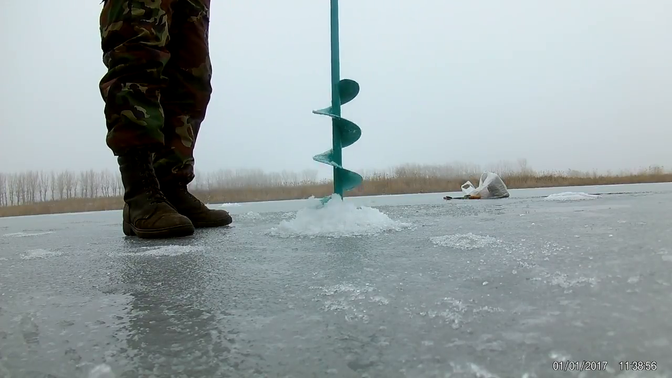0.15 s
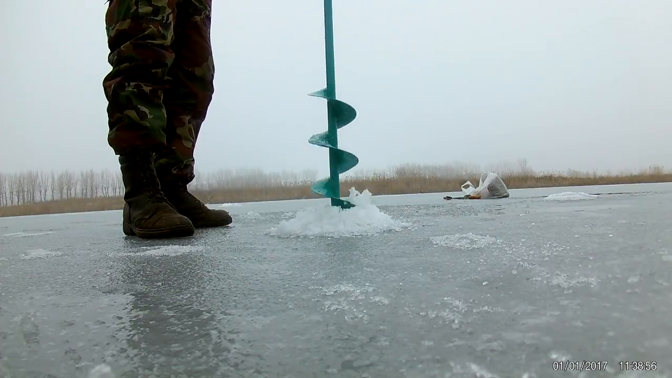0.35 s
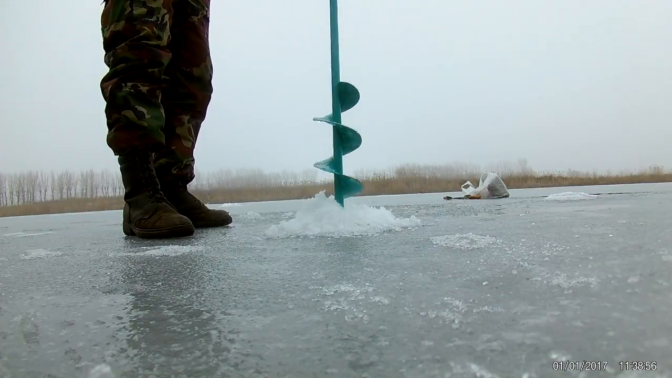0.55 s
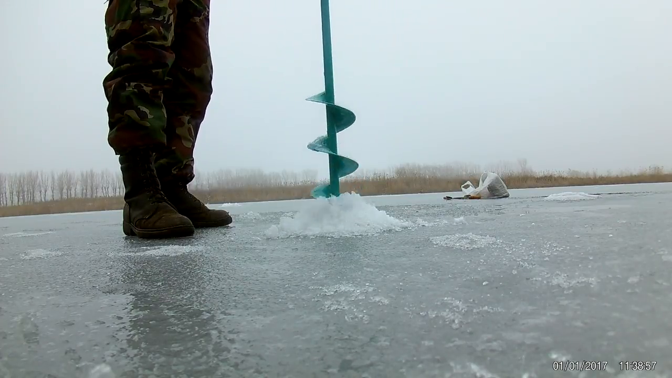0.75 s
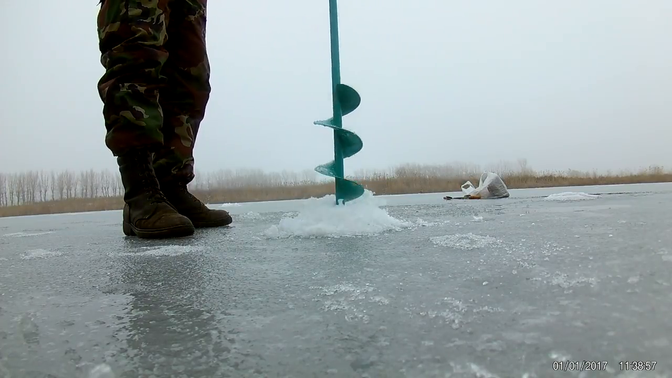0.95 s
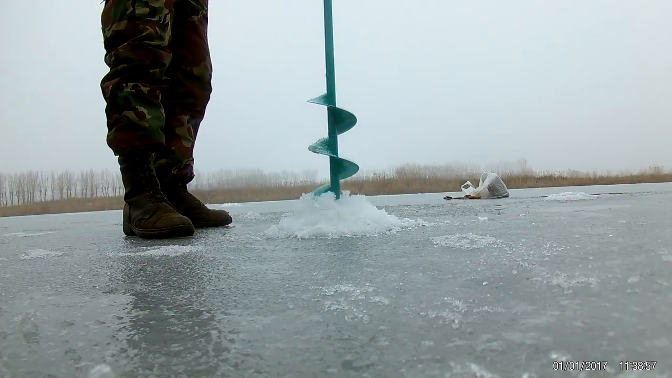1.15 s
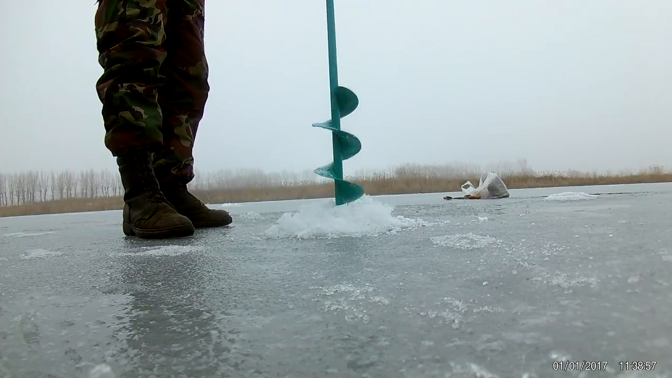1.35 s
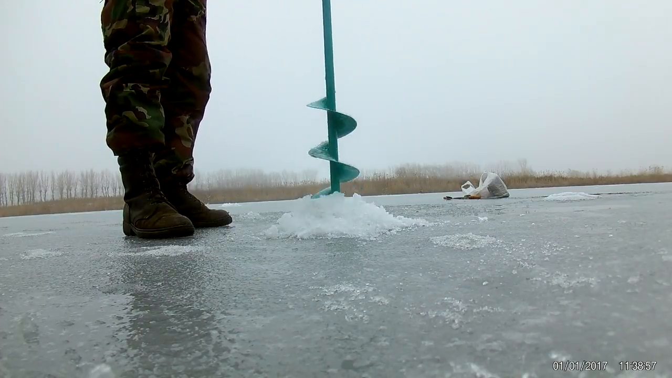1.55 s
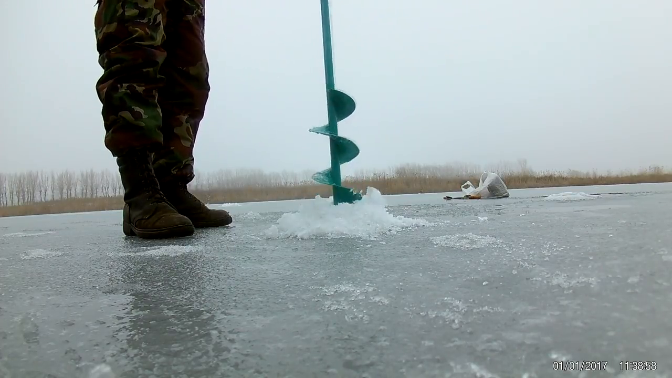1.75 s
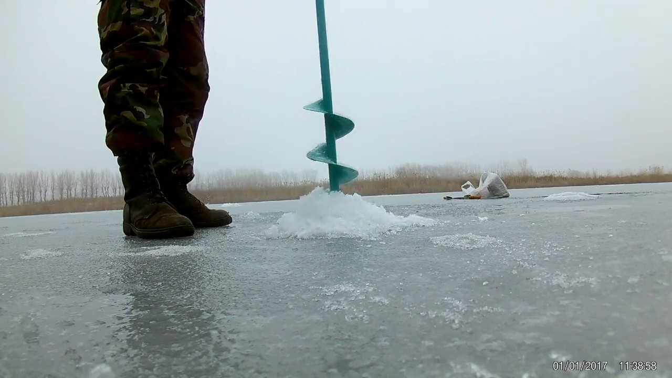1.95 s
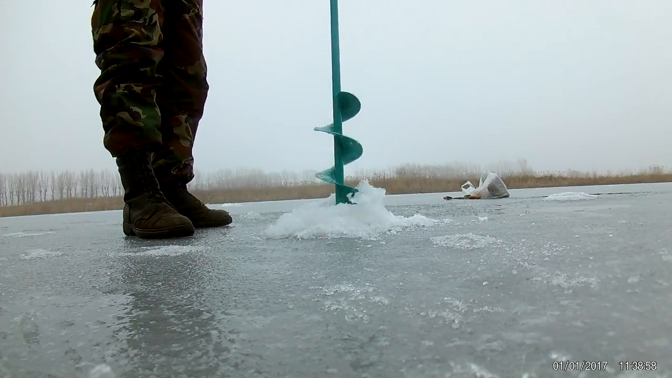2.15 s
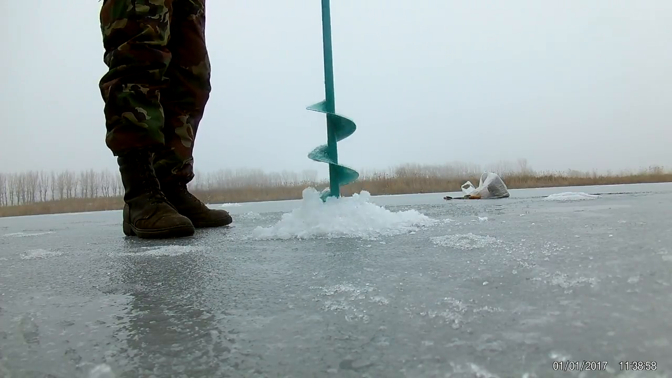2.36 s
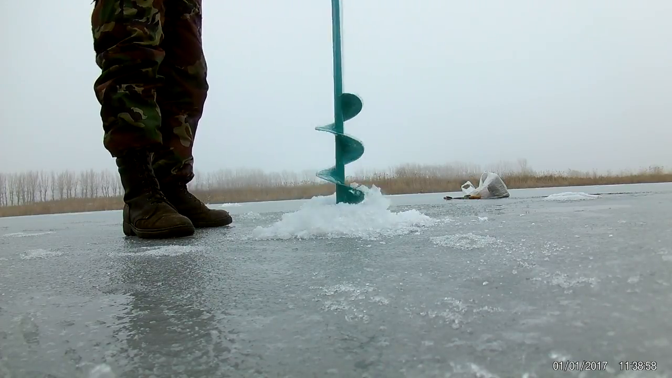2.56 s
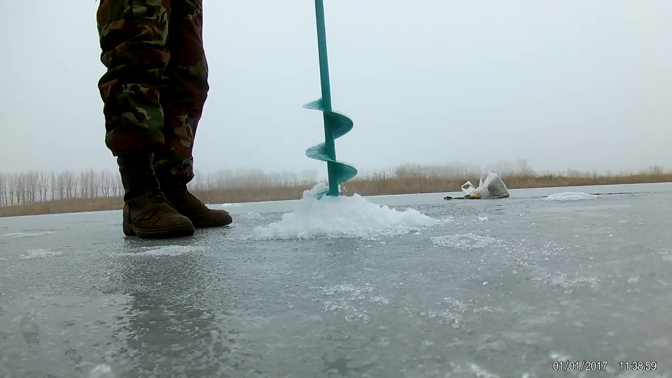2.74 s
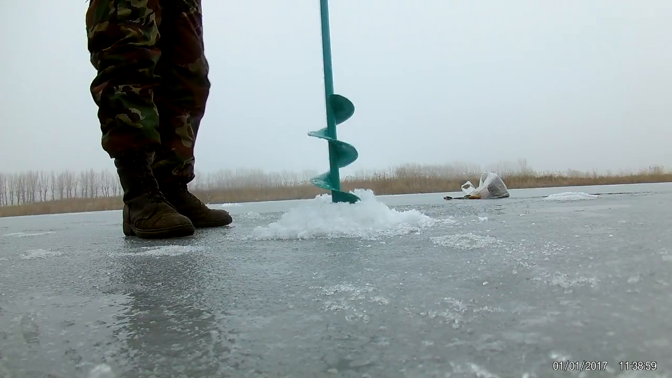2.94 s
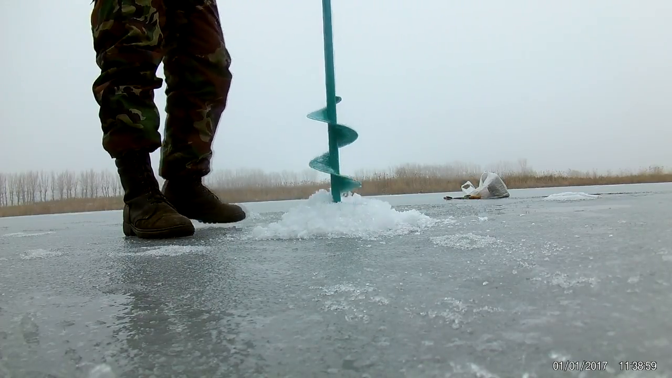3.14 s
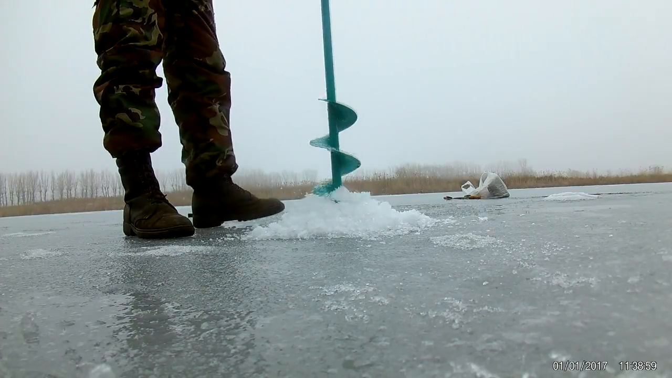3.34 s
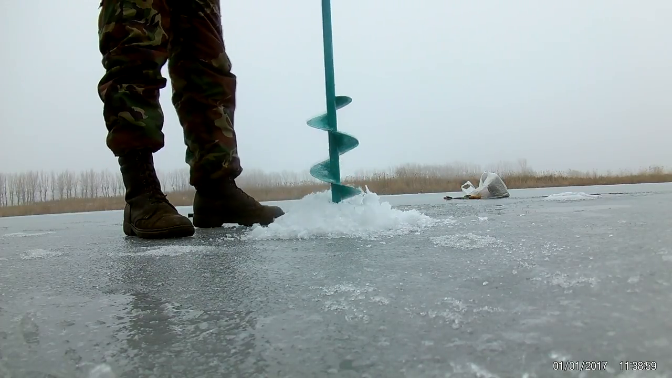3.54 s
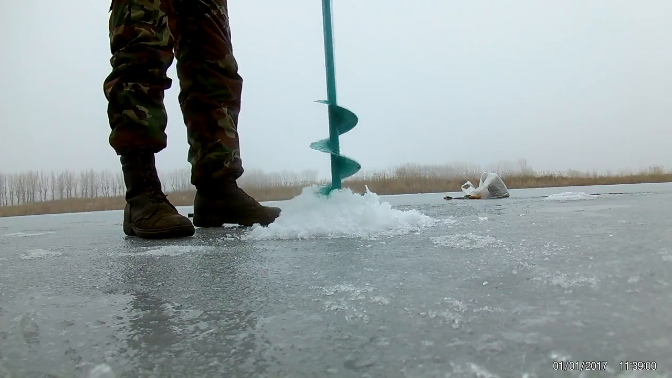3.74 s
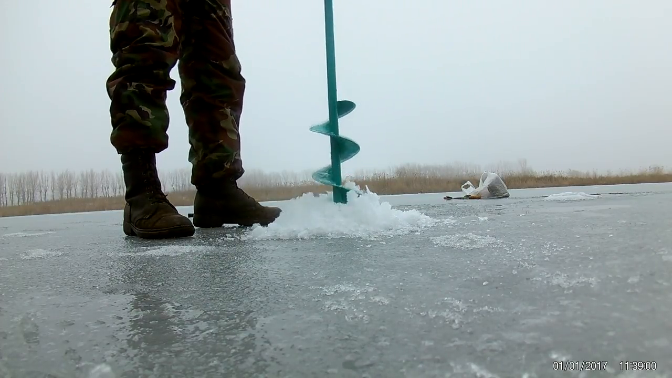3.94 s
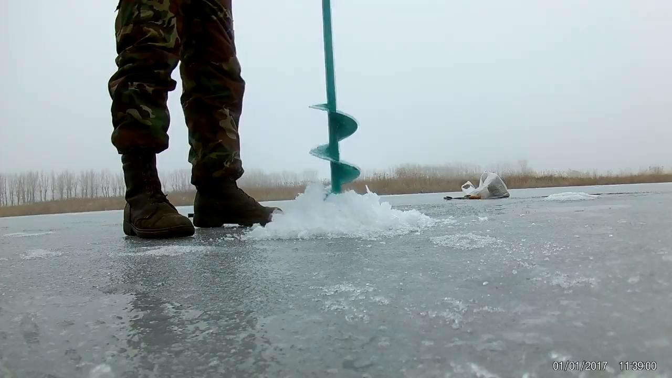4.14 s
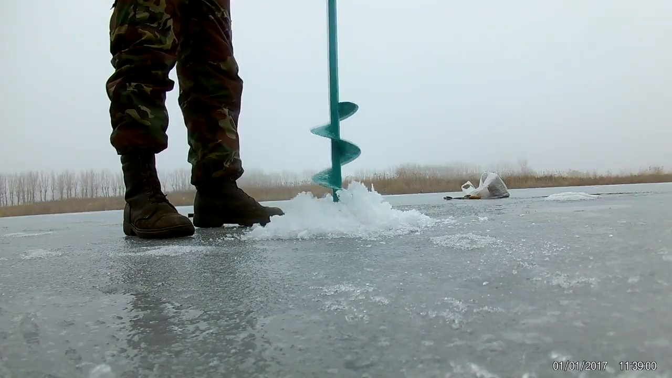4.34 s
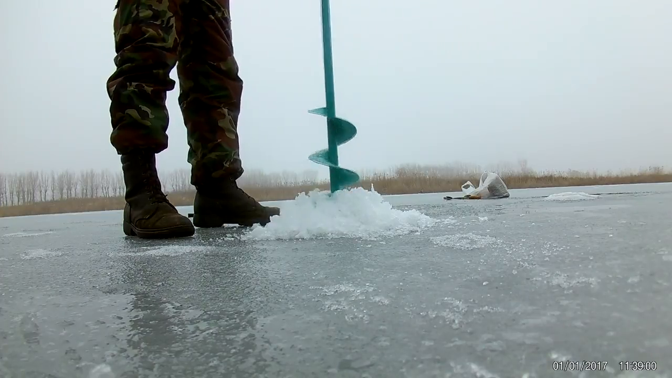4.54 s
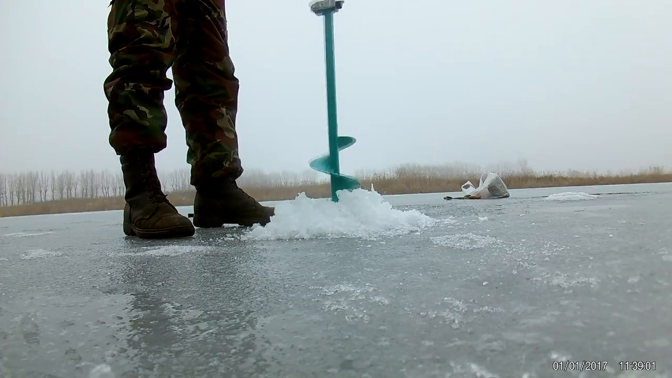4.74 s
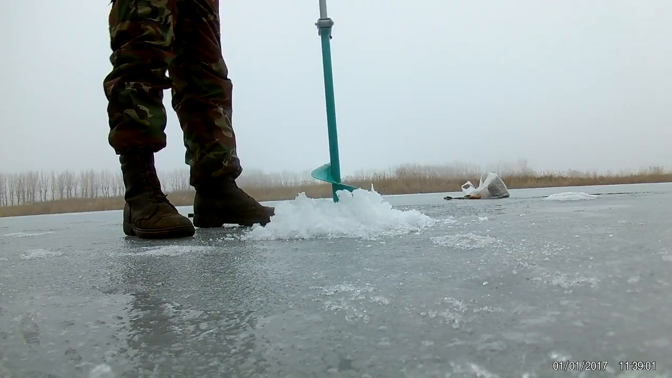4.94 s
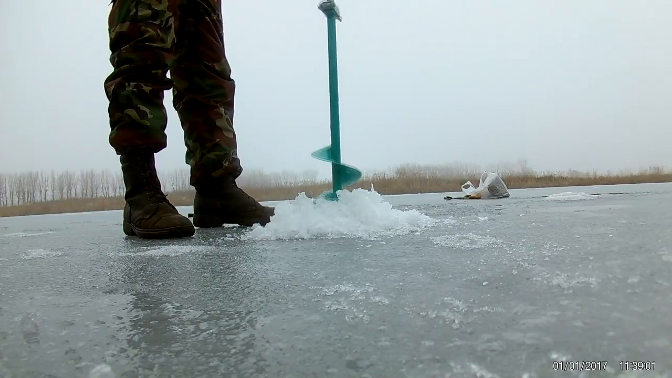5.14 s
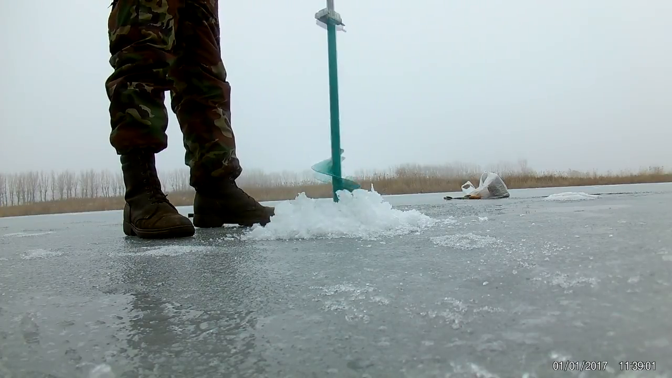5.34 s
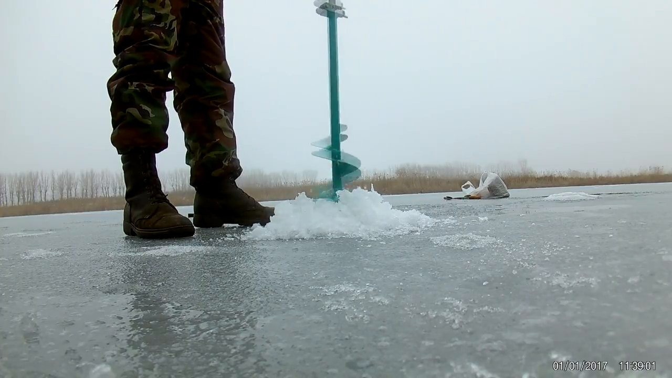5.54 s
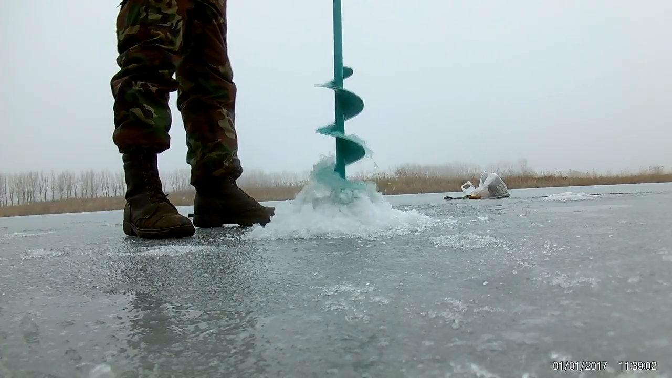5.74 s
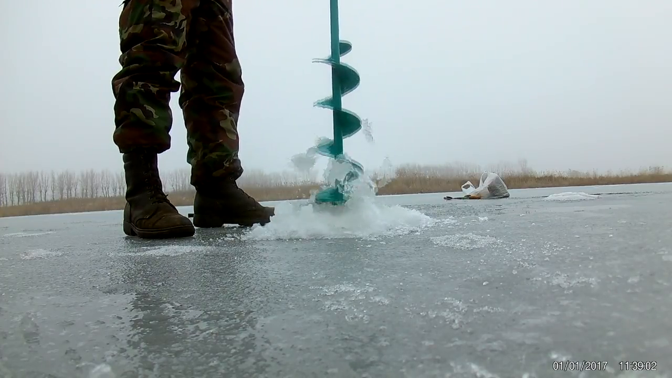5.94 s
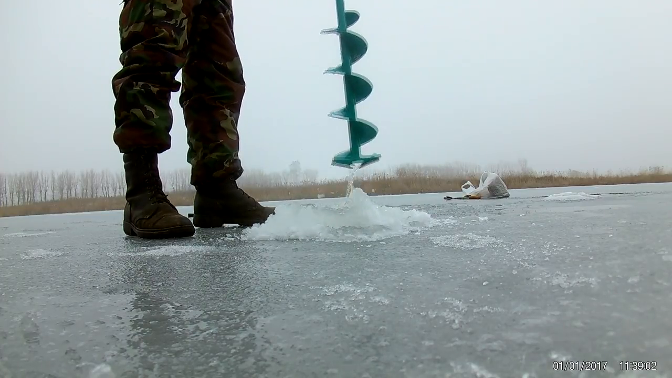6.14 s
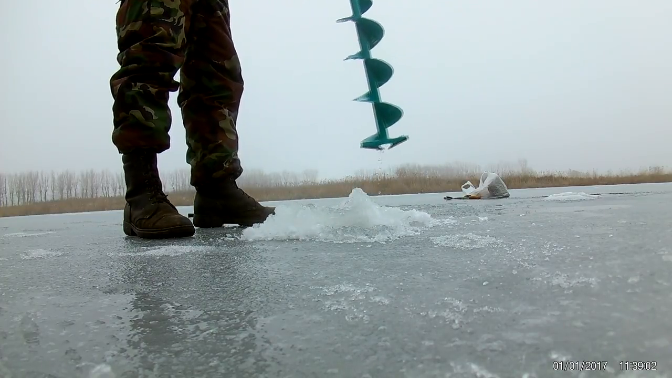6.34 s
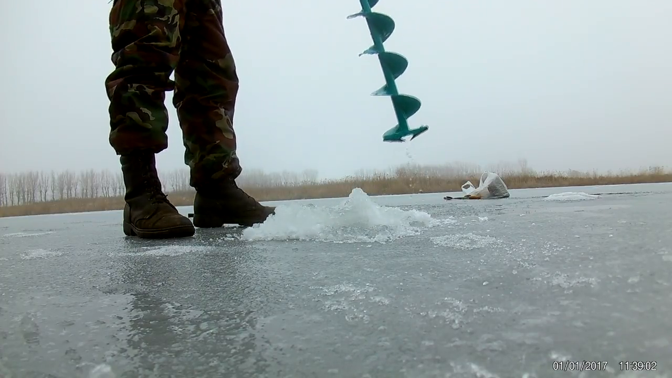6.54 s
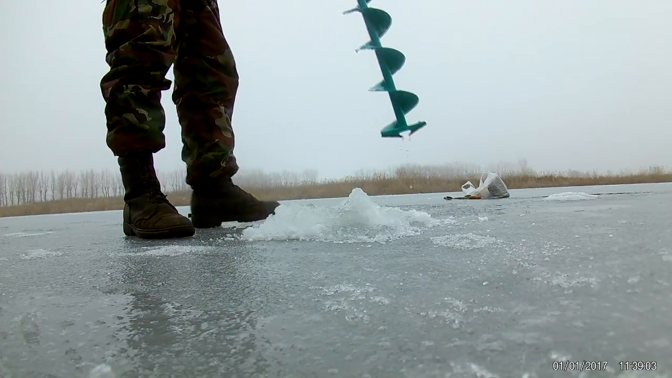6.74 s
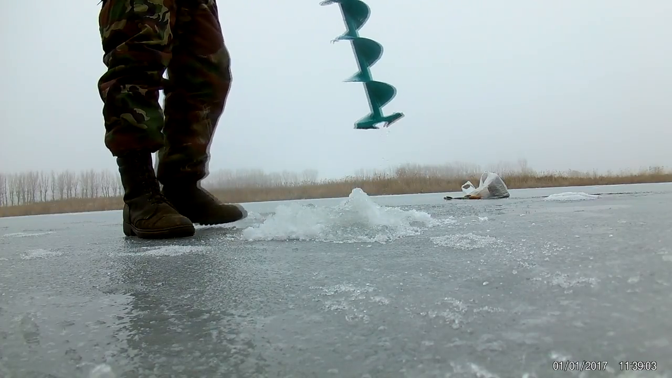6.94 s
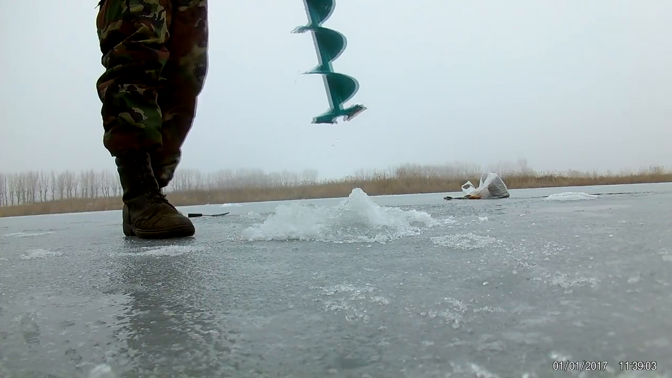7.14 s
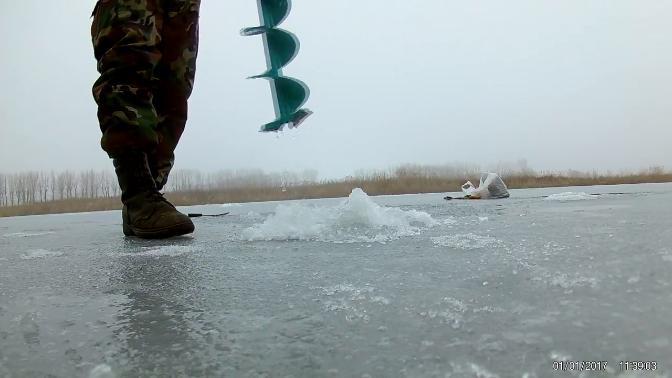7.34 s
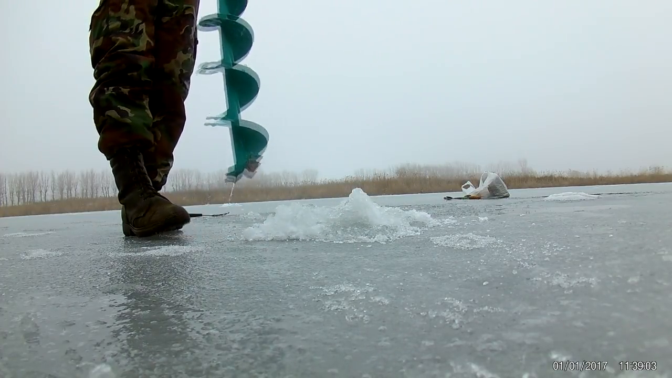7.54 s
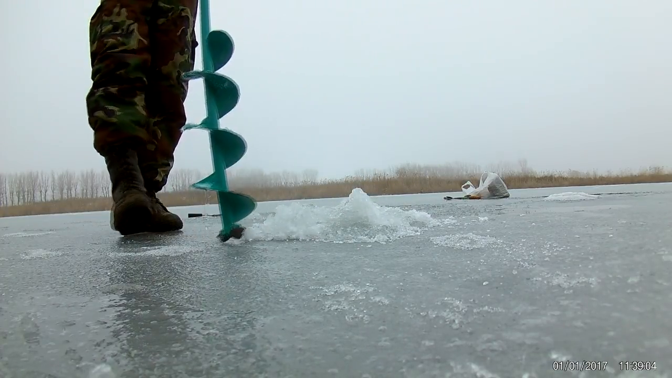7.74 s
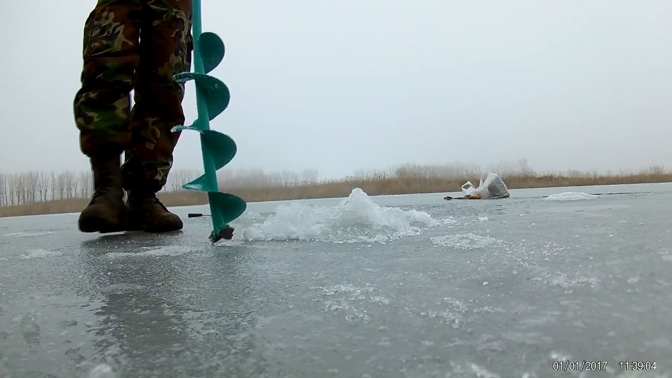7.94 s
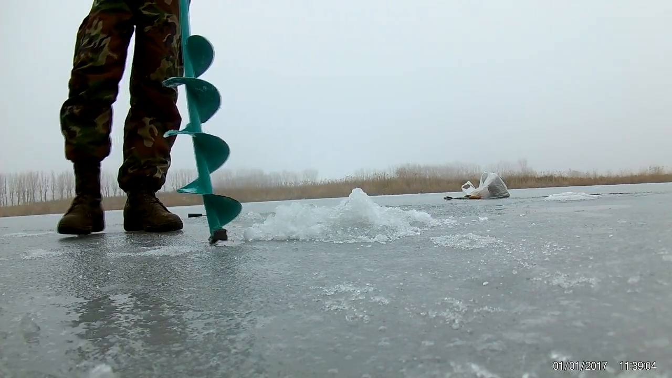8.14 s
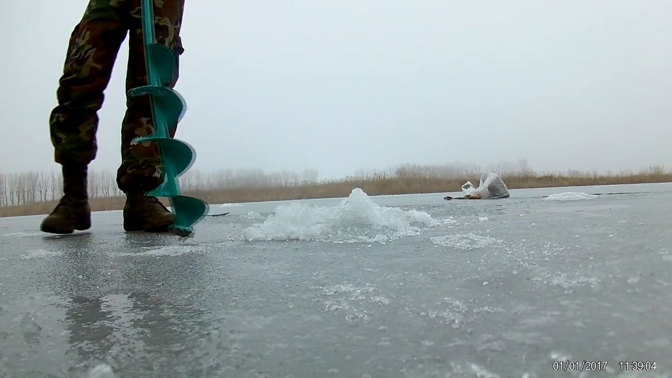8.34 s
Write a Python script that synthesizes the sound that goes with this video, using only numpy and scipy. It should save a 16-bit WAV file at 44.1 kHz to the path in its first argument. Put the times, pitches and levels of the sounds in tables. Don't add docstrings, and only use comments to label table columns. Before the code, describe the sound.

Close, boxy crunching of blades cutting ice, slipping and catching irregularly, lasts over half the scene. Then come clustered knocks, brief tonal groans and loud jerks as the jammed auger is pulled through. Afterwards there are sparse watery drips, a thin fading metal ring, slight grit underfoot and two low thumps on the ice. Still outdoor air; the microphone sits enclosed on the ice, with dull treble.

```python
import sys
import numpy as np
from scipy import signal
from scipy.fft import rfft, irfft
from scipy.io import wavfile

SR = 44100
rng = np.random.default_rng(int(sys.argv[2]) if len(sys.argv) > 2 else 0)


def gain_from_db(level_db):
    decades = np.asarray(level_db, float) / 20
    return 10 ** decades


def generate_wav(signal):
    frames = np.transpose(np.atleast_2d(signal))
    scaled = np.clip(frames, -1, 1) * 32767
    pcm = np.round(scaled).astype(np.int16)
    wavfile.write(sys.argv[1], SR, pcm)


N = 369999
TIME = np.arange(N) / SR
RUN_IN = 2000

# (time [s], bite [dB], weight leaning on the ice [dB])
EFFORT = [(0.0, -37, 1.5), (0.3, -36, 1.5), (0.75, -37, 1), (1.3, -37, -0.5), (1.75, -36, 0.5),
          (2.15, -37.5, 1), (2.45, -40, 1), (2.7, -42, 1), (2.87, -37, 0), (3.0, -38.5, 6.5), (3.3, -37, 3),
          (3.55, -38, -1.5), (3.9, -38.5, -2), (4.3, -37, -1), (4.52, -40, -0.5), (4.612, -32.5, 3.5),
          (4.772, -61.5, 27.5), (4.85, -90, 0)]
# (time [s], change of bite [dB], build-up [s])
SLIPS = [(0.005, -6, 0.063), (0.19, -2, 0.15), (0.33, -3, 0.054), (0.672, -2.5, 0.14), (0.849, -6, 0.058),
         (0.93, -5.5, 0.017), (0.975, -2, 0.032), (1.039, -1.5, 0.065), (1.11, 2, .04), (1.141, -5, 0.059),
         (1.238, -5, 0.096), (1.4, -1, .05), (1.949, -7, 0.032), (2.071, -14.5, 0.056), (2.18, -3, 0.03),
         (2.361, -5.5, 0.027), (2.49, -2.5, 0.16), (2.559, 9, 0.074), (2.6, -3.5, 0.15),
         (2.78, -6.5, 0.096), (3.33, 4, 0.16), (3.586, -13.5, 0.047), (3.65, 3.5, 0.016), (3.7, -8, 0.041),
         (3.8, 3.5, 0.062), (3.87, 1, 0.067), (3.99, 3.5, 0.12), (4.15, -1.5, 0.16), (4.44, -3, 0.063)]
# level while cutting [dB], response to bite [dB/dB], response to weight [dB/dB]
CUT_DB = [-44, -52, -40, -56.5]
CUT_FOLLOWS = [1, 1.3, 1.05, 0.99]
CUT_LEANS = [0.56, 0.66, .01, 0.055]
# (time [s], hold [s], bite [dB], release [dB/s], weight [dB])
JERKS = [
    (4.798, 0.0038, -43, 163, 2.5),
    (4.926, 0.029, -40.5, 844, 4.5),
    (5.138, 0.029, -39, 316.5, 2.5),
    (5.352, 0.022, -43.5, 147, 8.5),
    (5.39, 0.033, -34, 597, 3.5),
    (5.511, 0.097, -44, 246, 13),
    (5.74, .005, -53.5, 194, -4),
]
# level [dB], response to rise and release [dB/dB], response to weight [dB/dB]
JERK_DB = [1, -13, -3.5, -23.5]
JERK_FOLLOWS = [0.7, 0.78, 0.89, .9]
JERK_LEANS = [0.51, 1.16, 0.0091, .3]
# level [dB], fading [dB/s]
SLUSH_DB = [-101, -72, -61.5, -73]
SLUSH_FADES_DB_PER_S = [9, 66, 24, 18]
TRICKLE_DB = [-83, -84, -81.5, -90.5]
# (time [s], wall [dB], edge [dB], ice [dB])
CRACKS = [(0.265, -5.5, -42, -40), (0.3755, -24, -40, -46), (0.4631, -5, -36, -35), (0.7488, -9, -52, -49),
          (0.8785, -12, -15, -43), (1.081, -7, -33, -44), (1.2863, -28, -43, -34), (1.3536, -11, -43, -23),
          (1.4695, -10, -37, -26), (1.6821, -20, -45, -37), (1.827, -20, -31, -26), (1.9983, -16, -44, -32),
          (2.5466, -22, -15, -48), (3.1186, -5.5, -48, -28), (3.2834, -26, -38, -44),
          (3.4364, -34, -25, -41), (3.5945, -34, -38, -56), (3.79, -24, -38, -17),
          (4.3171, -39.5, -32, -26), (4.3755, -19, -44, -49)]
# (time [s], wall [dB], edge [dB], ice [dB])
JAM_KNOCKS = [(4.5738, -31, -34, -22), (4.580, -34, -16.5, -43), (4.606, -20.5, -14.5, -35),
              (4.6114, -33, -19, -16), (4.625, -27, -17.5, -49), (4.6412, -32, -24, -54),
              (4.652, -25, -33, -32), (4.6594, -32, -29, -35), (4.669, -28, -17.5, -44),
              (4.6889, -32, -57, -41), (4.7204, -47, -37.5, -45), (4.7386, -41, -54, -52),
              (4.7783, -39, -49, -51), (4.8015, -30, -39, -23), (4.8244, -35.5, -59, -33),
              (4.927, -34, -25, -37), (4.9554, -30, -23.5, -28), (4.975, -57, -39.5, -48),
              (5.0335, -59, -51, -34.5), (5.1016, -49, -50, -55), (5.107, -43, -46, -32)]
# (time [s], wall [dB], edge [dB], ice [dB])
PULL_KNOCKS = [(5.1413, -24.5, -27, -24.5), (5.165, -29, -30.5, -24), (5.1859, -26, -34, -25.5),
               (5.2113, -31, -34, -28.5), (5.24, -62, -52, -63), (5.2872, -46, -55, -69),
               (5.3, -46, -58, -64), (5.3395, -48, -41, -49), (5.3547, -26, -30.5, -46),
               (5.3755, -30, -33, -41), (5.3858, -21, -39, -34), (5.411, -26.5, -39, -34),
               (5.4209, -25, -24.5, -43), (5.4309, -25, -53, -22.5), (5.4585, -29.5, -36.5, -27),
               (5.5007, -45.5, -41, -39), (5.5076, -42.5, -48.5, -41), (5.523, -29.5, -29.5, -35.5),
               (5.5263, -18, -24, -24), (5.561, -16, -22, -22), (5.5744, -14, -22, -25.5),
               (5.5933, -27.5, -29.5, -21.5), (5.6049, -31, -30, -48), (5.6186, -18.5, -31, -57),
               (5.6394, -19, -34, -22.5), (5.6688, -26.5, -35.5, -31.5), (5.7117, -48, -52.5, -55),
               (5.7326, -45, -56, -50), (5.7473, -60, -58, -39)]
# (time [s], wall [dB], blade [dB], dust [dB])
SCUFFS = [(6.07, -82, -73, -66), (6.24, -80, -80, -68), (6.34, -70, -80, -82), (6.69, -66, -76, -84),
          (6.74, -70, -77.5, -81.5), (7.285, -72, -84.5, -86), (7.545, -70, -76, -84),
          (7.575, -71, -83, -84), (7.6106, -64, -78, -80), (7.655, -78, -86.5, -72), (7.817, -50, -63, -62),
          (7.829, -64, -67, -72), (7.839, -54, -68, -72), (7.857, -57, -66, -61), (8.0206, -52, -53, -56.5),
          (8.031, -67, -62, -63.5), (8.039, -71.5, -72, -70), (8.1694, -72, -70.5, -74),
          (8.2876, -70, -62, -70), (8.2964, -50.5, -66, -66.5), (8.3065, -54.5, -62, -65),
          (8.325, -58, -66, -74)]
DRIVING_COLUMN = [0, 1, 2, 2]
# (frequency [Hz], width [Hz], level [dB])
LOW_MODES = [(52.7, 70, -30.5), (82.4, 29, -14), (138.6, 29.6, -2.5), (258, 76.7, -4.5), (328.3, 49.8, 1.5),
             (439.5, 110, -12), (570, 78, -12.5), (752, 210, -15)]
# (frequency [Hz], width [Hz], level [dB])
WALL_MODES = [(1095, 155, -13.5), (1274, 81, -7.5), (1390, 87, -0.5), (1704, 242, -7), (2181, 187, -8.5),
              (2497, 219, -18)]
# (frequency [Hz], width [Hz], level [dB])
TOP_MODES = [(2868, 150, 2.5), (3290, 337, 1.5), (4068, 340, -2.5), (4780, 435, -12.5), (5740, 360, -18.5),
             (6350, 540, -23), (7150, 460, -30.5)]
# (crest time [s], frequency [Hz], peak [dB], half length [s])
CHATTER = [(4.803, 1390, -34.5, 0.0072), (5.136, 340, -43.5, 0.027), (5.175, 331, -30, 0.019),
           (5.219, 570, -45.5, 0.023), (5.431, 328, -20.5, 0.015), (5.21, 141.2, -40.5, 0.045),
           (5.464, 1380, -31, 0.0099), (5.53, 1403, -19, 0.0077), (5.562, 1390, -20, 0.0049),
           (5.575, 1390, -29, 0.0039), (5.621, 1360, -24, 0.011), (5.645, 505, -34, 0.013),
           (4.68, 72.4, -50, 0.047), (5.0, 75.5, -57, .04), (5.17, 147, -30, 0.015),
           (5.37, 144, -46, 0.034), (5.535, 65, -42.5, 0.018), (5.76, 139, -53, 0.02),
           (4.61, 283, -27, 0.0065), (4.811, 285, -32.5, 0.0042), (5.553, 400, -31, 0.0077),
           (4.94, 1420, -35, 0.0085), (5.389, 1390, -30, 0.0065), (5.414, 1586, -32, 0.0045),
           (4.658, 1544, -29, 0.011), (2.557, 3200, -49, .012), (2.569, 1450, -32, .006),
           (2.604, 1340, -38, 0.0026), (2.739, 1440, -36, 0.0028), (3.597, 1700, -37.5, 0.0027),
           (3.714, 1350, -41, .003), (0.95, 124, -50, 0.032), (1.31, 144, -45, 0.031),
           (2.02, 128, -46, 0.026), (2.56, 125, -56, 0.035), (4.36, 142, -44, 0.03),
           (5.185, 1420, -33.5, 0.0079)]
# (crest time [s], frequency [Hz], peak [dB], half length [s])
WALL_SWELLS = [(0.047, 1480, -29, 0.0027), (0.109, 1390, -35, 0.0094), (0.268, 1420, -36, 0.0039),
               (0.286, 1460, -30, 0.0058), (0.38, 1374, -27.5, 0.0045), (0.469, 1430.0, -30, 0.002),
               (0.534, 1410, -33, 0.0027), (0.551, 1400, -33, 0.0043), (0.581, 1450, -37, 0.0026),
               (0.71, 1470, -37, 0.0088), (0.758, 1444, -30.5, 0.0078), (0.837, 1350, -32, 0.0033),
               (0.883, 1366, -28.5, 0.0051), (0.912, 1550, -32, 0.0079), (0.982, 1432, -33.5, 0.018),
               (1.124, 1420, -31, 0.0047), (1.194, 1340, -30.5, 0.0046), (1.288, 1390.0, -35, 0.011),
               (1.358, 1437, -38, 0.011), (1.417, 1620, -33, 0.0042), (1.473, 1390, -36, 0.007),
               (1.527, 1470, -43, 0.0069), (1.583, 1400, -36, 0.0082), (1.638, 1420, -40, 0.0067),
               (1.699, 1310, -29.5, 0.0092), (1.832, 1404, -27, 0.0049), (1.996, 1430, -30, 0.0035),
               (2.123, 1460, -30, 0.0044), (2.309, 1490, -32.5, 0.0024), (2.405, 1390.0, -33.5, 0.0053),
               (2.552, 1454, -29.5, 0.0037), (2.668, 1520, -37, 0.0052), (3.095, 1420, -33, 0.0055),
               (3.121, 1370.0, -30, 0.0032), (3.161, 1414, -33, 0.0081), (3.287, 1350, -32, 0.0046),
               (3.311, 1390, -32, 0.003), (3.33, 1390.0, -34, 0.0028), (3.378, 1470, -42, 0.0026),
               (3.439, 1400, -35, 0.006), (3.525, 1490.0, -43, 0.0034), (3.644, 1435, -32.5, 0.0067),
               (3.809, 1450, -38, 0.0043), (3.938, 1400, -41, 0.0043), (3.981, 1370, -46, 0.0097),
               (4.09, 1390, -41, 0.0051), (4.148, 1490, -37, 0.0056), (4.289, 1490, -35, 0.0057),
               (4.347, 1430, -46, 0.0042), (4.393, 1410, -30, 0.0056)]
# (crest time [s], frequency [Hz], peak [dB], half length [s])
ICE_SWELLS = [(0.053, 292, -31, 0.0066), (0.114, 327, -32, 0.0061), (0.233, 343, -38, 0.0072),
              (0.281, 316, -35.5, 0.013), (0.373, 315, -38, 0.012), (0.451, 320.0, -37, 0.0083),
              (0.491, 296, -38.5, 0.014), (0.53, 307, -38, 0.009), (0.589, 318, -37.5, 0.017),
              (0.74, 318, -39.5, 0.016), (0.802, 320.0, -40.5, 0.0079), (0.996, 325, -36.5, 0.02),
              (1.139, 318, -37, 0.0086), (1.356, 313, -37, 0.0096), (1.41, 320.0, -52, 0.0066),
              (1.51, 317, -37, 0.0079), (1.602, 290.0, -46, 0.0092), (1.683, 310, -36.5, 0.032),
              (1.767, 348, -43, 0.015), (1.833, 336, -54, 0.036), (2.142, 323, -36, 0.015),
              (2.212, 318, -45, 0.012), (2.254, 317, -41, 0.0095), (2.311, 304, -36, 0.0046),
              (2.561, 290, -53, 0.037), (2.93, 302, -40, 0.0076), (3.013, 296, -37.5, 0.011),
              (3.077, 307, -35, 0.0062), (3.12, 328, -38, 0.0084), (3.15, 332, -39, 0.0078),
              (3.318, 270.0, -33, 0.0084), (3.371, 330.0, -36, 0.0071), (3.74, 310, -33, 0.0061),
              (3.795, 333, -32, 0.016), (3.905, 296, -41, 0.011), (3.966, 304, -35.5, 0.0054),
              (3.996, 318, -33, 0.0077), (4.054, 312, -36.5, 0.0052), (4.17, 323, -39.5, 0.017),
              (4.335, 320.0, -49, 0.014)]
# (crest time [s], frequency [Hz], peak [dB], half length [s])
TIP_RINGS = [
    (7.863, 1800, -62, .006),
    (8.045, 1690, -60, 0.02),
    (8.036, 4060, -70, 0.0082),
]
# (crest time [s], frequency [Hz], peak [dB], half length [s])
PLOPS = [
    (5.878, 800, -54, 0.0025),
    (6.015, 2620, -61, .003),
]
# (time [s], peak [dB], tick [dB])
CLUNKS = [
    (7.815, -23, -27.5),
    (8.015, -24.5, -24.5),
]
# (frequency [Hz], level [dB], swell time [s], first swing [1 up, -1 down])
CLUNK_MODES = [(78, -28.5, 0.018, 0.91), (143, -19.5, 0.017, -0.93), (149.5, -8.5, 0.0069, -0.67),
               (234, -8, 0.0035, 0.67), (318, -5, 0.0062, -0.7), (348.5, -18, 0.011, -0.87),
               (394, -18, 0.0037, -0.087), (528, -30, 0.011, 0.23)]
# (time [s], peak [dB], pitch [Hz], tick on the wall [dB])
DRIPS = [(5.817, -51, 1290, -66), (5.849, -38.5, 1580, -66), (5.876, -43, 1300, -65),
         (5.929, -60, 1430, -72), (5.987, -50, 1390, -67), (6.011, -51, 1370, -65), (6.042, -54, 1540, -71),
         (6.073, -65, 1350, -61), (6.156, -51, 1400, -68), (6.229, -54, 1360, -88), (6.25, -58, 1430, -75),
         (6.293, -60, 1390, -75), (6.324, -51.5, 1524, -72), (6.349, -61, 1580, -74),
         (6.558, -65.5, 1400, -57), (6.636, -60, 1630, -69.5), (6.689, -62, 1450, -66.5),
         (6.731, -65, 1555, -59), (6.759, -58, 1470, -72), (6.918, -64, 1390, -73), (7.004, -60, 1350, -68),
         (7.05, -68, 1420, -64), (7.184, -55.5, 1405, -76), (7.207, -62, 1560, -78), (7.25, -58, 1340, -73),
         (7.269, -62.5, 1480, -73.5), (7.313, -67, 1390, -73.5), (7.352, -71, 1430, -60.5),
         (7.409, -49, 1650, -63), (7.449, -59, 1440, -80), (7.473, -64, 1420, -74), (7.54, -58, 1430, -70),
         (7.664, -70, 1560, -74.5)]
# (frequency [Hz], level [dB per Hz])
AIR = [(15, -28.5), (25, -2.5), (86, 0.5), (129, -1.5), (350, -7.5), (538, -11.5), (1110, -14.5),
       (1380, -16), (1580, -16.5), (3730, -24), (7320, -27.5), (8370, -29.5), (15600, -30.5)]
SLUSH_S = 5.84


def auger(drip_ticks, tip_ticks):
    deep_db, upper_db, chips_db, dust_db = fracturing()
    bite_db = 0.28 * drift(rate_hz=20.0) + 1.0 * drift(rate_hz=27.0)
    cracks = bursts(CRACKS, [-17.0, -13.0, -11.5, -17.5], rise=0.013, t60=0.12, snap_db=11.0)
    jam = bursts(JAM_KNOCKS, [1.0, -5.5, -8.5, -13.5], rise=0.00042, t60=0.026, snap_db=16.8)
    pull = bursts(PULL_KNOCKS, [-4.0, -2.0, -15.0, 2.0], rise=0.00058, t60=0.041, snap_db=16.0)
    crunch, snap = cracks + jam + pull
    grit, _ = bursts(SCUFFS, [0.0, 9.5, 7.0, 2.0], rise=0.0046, t60=0.029, snap_db=-30.0)

    fine = grains(per_s=2500, spread_db=0.0)
    coarse = grains(per_s=900, spread_db=1.0)
    shards = grains(per_s=700, spread_db=4.0)
    loose = np.where(TIME < SLUSH_S, fine, 0.53 * fine + 0.41 * shards)
    near_grit, ringing_grit, low_grit, top_grit = grit * fine

    chips = gain_from_db(chips_db - 0.5 + bite_db) * loose + drip_ticks
    near, high = crunch[:2] * shards + snap[:2]
    bright = chips + high + 0.403 * drip_ticks
    wall_forces = [chips + 0.9 * near + tip_ticks,
                   chips + near + near_grit + tip_ticks,
                   chips + near + near_grit + tip_ticks,
                   bright + ringing_grit + tip_ticks,
                   bright + 0.29 * ringing_grit + 0.74 * tip_ticks,
                   bright]

    deep = (gain_from_db(deep_db - 2.0 + 0.5 * bite_db) + crunch[2]) * coarse + 0.35 * snap[2] + low_grit
    rocked = deep + 1.8 * crunch[2] * shards
    upper = gain_from_db(upper_db + 7.0 + 0.5 * bite_db) * coarse
    upper_knock = upper + crunch[3] * shards + snap[3] + low_grit
    ice_forces = [rocked] + [deep] * 4 + [upper_knock] * 2 + [upper]

    thrown = gain_from_db(-24.0) * high
    dust = gain_from_db(dust_db - 2.5 + 1.2 * bite_db) * loose + thrown + gain_from_db(-16.0) * drip_ticks
    top_forces = [dust, dust + 0.7 * top_grit, dust + 1.64 * top_grit, dust] + [dust - 1.1 * thrown] * 3

    modes = housing(ice_forces, LOW_MODES, patchy_db=0.75)
    modes = modes + housing(wall_forces, WALL_MODES, patchy_db=0.81)
    modes = modes + housing(top_forces, TOP_MODES, patchy_db=1.5)
    blade = ring(ringing_grit * gain_from_db(-27.5), hz=1685, t60=0.13)
    through = np.r_[modes[RUN_IN:0:-1], modes + blade]
    wall = signal.butter(16, 7550, fs=SR, output="sos")
    return signal.sosfilt(wall, through)[RUN_IN:]


def fracturing():
    s, bite, lean = np.transpose(EFFORT)
    bite_db, lean_db = np.interp(TIME, s, bite), np.interp(TIME, s, lean)
    for s, change_db, build in SLIPS:
        bite_db = bite_db + np.interp(TIME, [s - build, s, s + 0.39 * build], [0, change_db, 0])
    mean_bite_db = -38
    bite_part = np.outer(CUT_FOLLOWS, bite_db - mean_bite_db)
    total = gain_from_db(np.c_[CUT_DB] + bite_part + np.outer(CUT_LEANS, lean_db))

    rise_db_per_s = 2499
    for s, hold, peak_db, release, weight_db in JERKS:
        rising, falling = rise_db_per_s * (TIME - s), release * (s + hold - TIME)
        below_db = np.minimum(0, np.minimum(rising, falling))
        full_db = peak_db + np.c_[JERK_DB] + weight_db * np.c_[JERK_LEANS]
        total += gain_from_db(full_db + np.outer(JERK_FOLLOWS, below_db))

    ends_s, edge_s = 6.365, 0.0046
    sliding = np.interp(TIME, [SLUSH_S - edge_s, SLUSH_S, ends_s, ends_s + edge_s], [0, 1, 1, 0])
    faded_db = np.outer(SLUSH_FADES_DB_PER_S, np.maximum(TIME - SLUSH_S, 0))
    total += sliding * gain_from_db(np.c_[SLUSH_DB] - faded_db)
    return 20 * np.log10(total + gain_from_db(np.c_[TRICKLE_DB]))


def bursts(rows, trims_db, rise, t60, snap_db):
    usual_hit_db, hard_is_short = -31, 0.085
    crunch, snap = np.zeros((2, 4, N))
    for s, *levels_db in rows:
        i = round(s * SR)
        t = TIME[:min(N - i, SR // 2)]
        gains = gain_from_db(np.take(levels_db, DRIVING_COLUMN) + trims_db)
        harder_db = np.clip(max(levels_db) - usual_hit_db, -20, 30)
        dies = t60 * gain_from_db(-hard_is_short * harder_db)
        crunch[:, i:i + len(t)] += gains[:, None] * (1 - np.exp(-t / rise)) * gain_from_db(-60 * t / dies)
        snap[:, i] += gains * gain_from_db(snap_db)
    return np.array([crunch, snap])


def grains(per_s, spread_db):
    sizes = gain_from_db(spread_db * np.minimum(rng.exponential(1, N), 5)) * rng.choice([-1, 1], N)
    breaks = rng.random(N) < per_s / SR
    return rms_one(sizes * breaks + 1e-9)


def housing(forces, modes, patchy_db):
    out, power = 0, 0
    for k, (force, (hz, width_hz, level_db)) in enumerate(zip(forces, modes)):
        r = np.exp(-1.5 * np.pi * width_hz / SR)
        b = (1 - r * r) / 2
        pole = [b, 0, -b, 1, -2 * r * np.cos(2 * np.pi * hz / SR), r * r]
        wander = drift(rate_hz=8.3) + 1.2 * drift(rate_hz=20.0)
        driven = np.r_[force[RUN_IN:0:-1], force * gain_from_db(level_db + patchy_db * wander)]
        out = out + (-1) ** k * signal.sosfilt([pole, pole], driven)[RUN_IN:]
        power += gain_from_db(2 * level_db) * (1 - r) / 2
    return out / np.sqrt(power)


def drift(rate_hz):
    r = np.exp(-40 * np.pi * rate_hz / SR)
    noise = rng.standard_normal(N // 20 + 2002)
    slow = signal.lfilter([1], [1, -2 * r, r * r], noise)[2000:]
    return np.interp(np.arange(N) / 20, np.arange(len(slow)), rms_one(slow))


def rms_one(x):
    return x / np.sqrt(np.mean(x ** 2) + 1e-20)


def ring(clicks, hz, t60):
    r, w = gain_from_db(-60 / (t60 * SR)), 2 * np.pi * hz / SR
    return signal.lfilter([0, np.sin(w)], [1, -2 * r * np.cos(w), r * r], clicks + 1e-18)


def chatter():
    margin = SR // 10
    out = np.zeros(N + 2 * margin)
    t = np.arange(-margin, margin) / SR
    for rows, build in (CHATTER + PLOPS + TIP_RINGS + ICE_SWELLS, 1), (WALL_SWELLS, 0.61):
        for s, hz, peak_db, half in rows:
            i = round(s * SR)
            length = half * np.where(t < 0, build, 1 / build ** 0.5)
            swell = np.exp(-(t / length) ** 2)
            out[i:i + len(t)] += gain_from_db(peak_db) * swell * np.sin(2 * np.pi * hz * t)
    return out[margin:margin + N]


def clunks():
    thuds, ticks = np.zeros((2, N))
    t = TIME[:SR // 5]
    for s, peak_db, tick_db in CLUNKS:
        ticks[round((s + 0.0002) * SR)] = gain_from_db(peak_db + tick_db + 22.0)
        for hz, level_db, swell, swing in CLUNK_MODES:
            delay_s = 0.059 / np.sqrt(hz)
            i = round((s - 0.0008 + delay_s) * SR)
            envelope = t / swell * np.exp(1 - t / swell)
            thuds[i:i + len(t)] += swing * gain_from_db(peak_db + level_db) * envelope * np.sin(2 * np.pi * hz * t)
    return thuds, ticks


def drips():
    ping, tick = np.zeros((2, N))
    t = TIME[:SR // 10]
    for s, peak_db, hz, tick_db in DRIPS:
        i = round(s * SR)
        envelope = gain_from_db(peak_db - 1.5 - 60 * t / 0.021) * (1 - np.exp(-t / 0.00045))
        ping[i:i + len(t)] += envelope * np.sin(2 * np.pi * hz * t)
        tick[i] = gain_from_db(tick_db + 14.0)
    return ping, tick


def shaft():
    click = np.zeros(N)
    click[round(5.7 * SR)] = gain_from_db(-62)
    return ring(click, hz=447, t60=2.1)


def air():
    hz = np.maximum(np.fft.rfftfreq(N, 1 / SR), 1)
    points_hz, points_db = np.transpose(AIR)
    shape = gain_from_db(np.interp(np.log(hz), np.log(points_hz), points_db))
    noise = irfft(rfft(rng.standard_normal(N)) * shape, N)
    return gain_from_db(-69.5) * rms_one(noise)


def scene():
    pings, drip_ticks = drips()
    thuds, tip_ticks = clunks()
    mix = auger(drip_ticks, tip_ticks) + chatter() + pings + thuds + shaft() + air()
    return mix[None]


def low_pass(x):
    return signal.sosfilt(signal.butter(12, 15700, fs=SR, output="sos"), x)


def record(dry):
    return low_pass(dry)


dry = scene()
out = record(dry)
generate_wav(out)
```